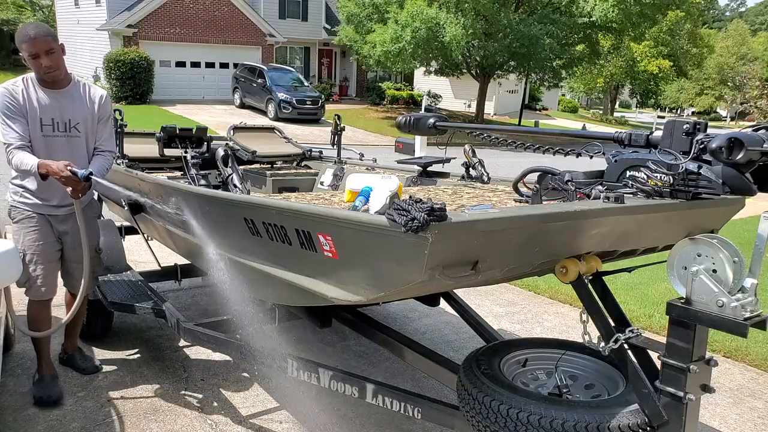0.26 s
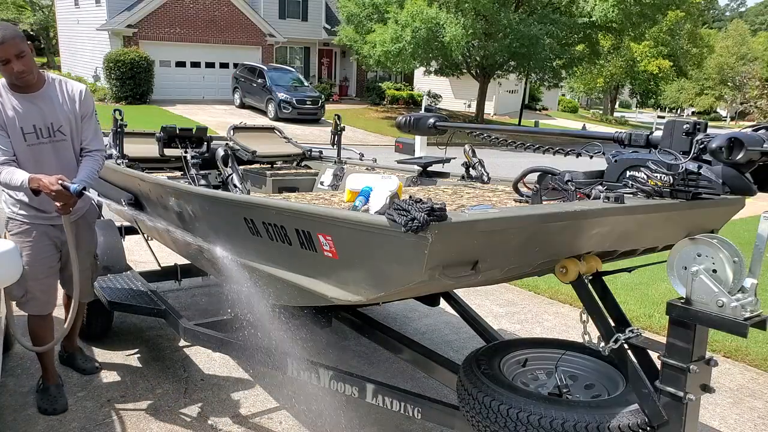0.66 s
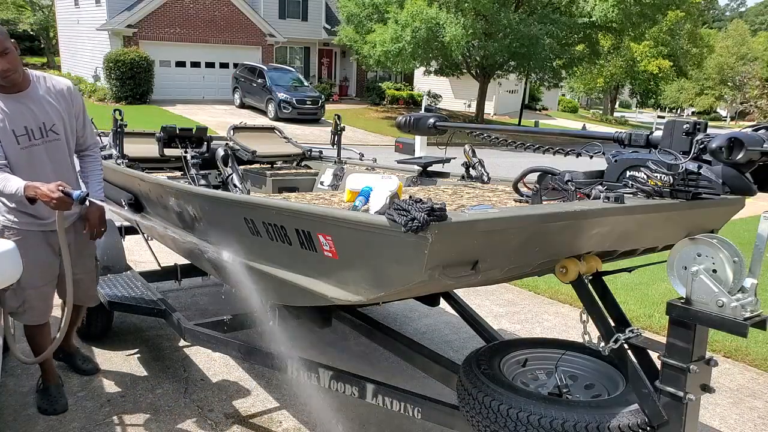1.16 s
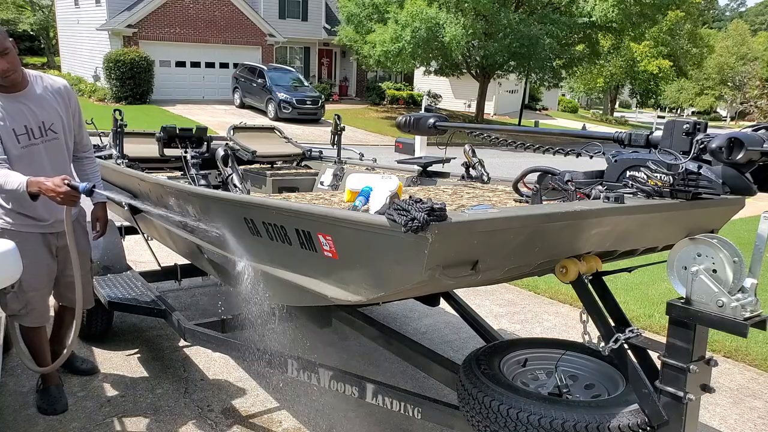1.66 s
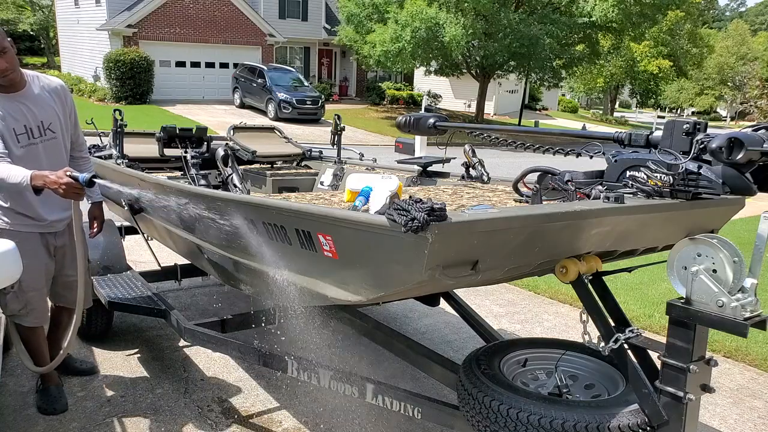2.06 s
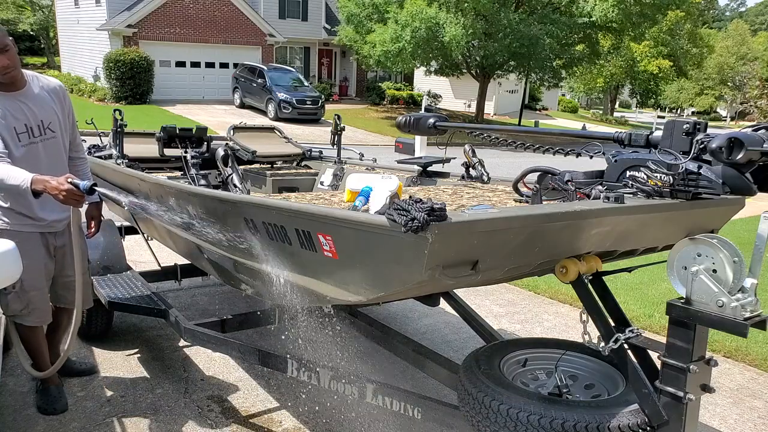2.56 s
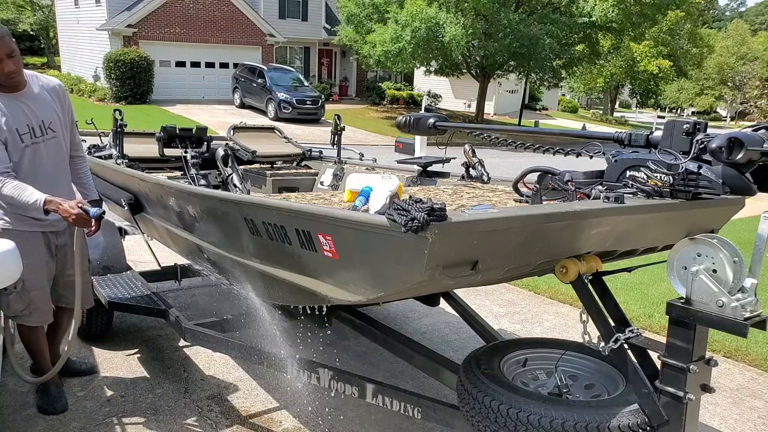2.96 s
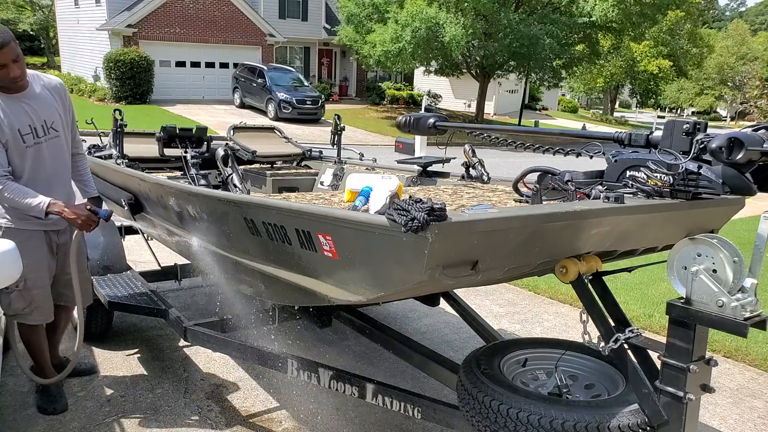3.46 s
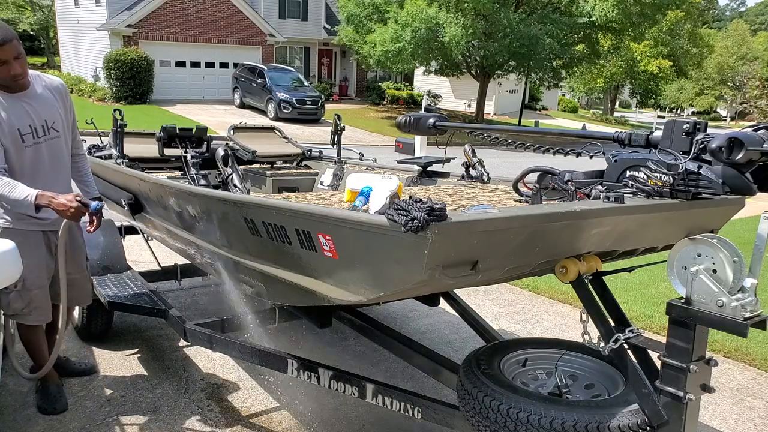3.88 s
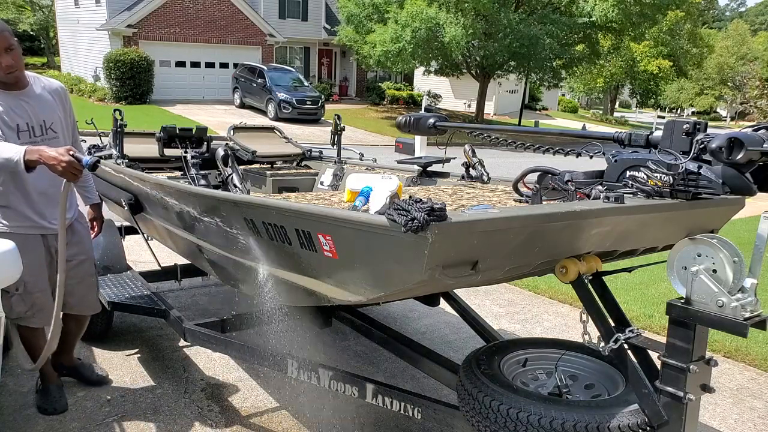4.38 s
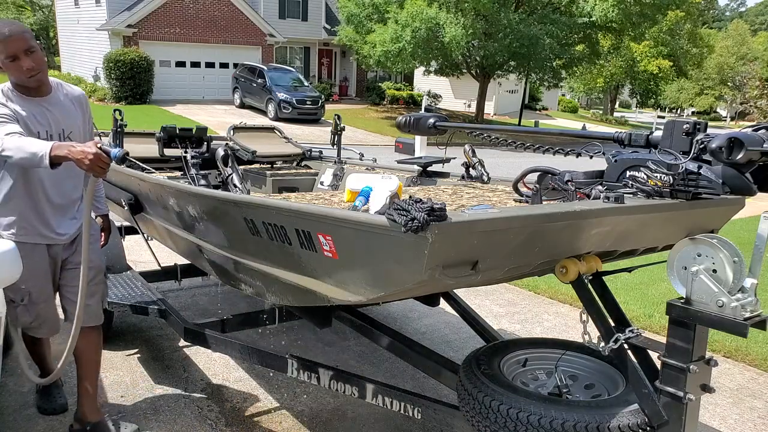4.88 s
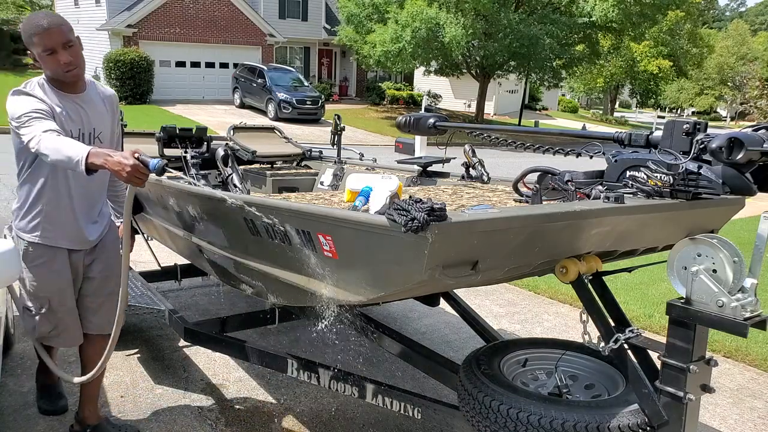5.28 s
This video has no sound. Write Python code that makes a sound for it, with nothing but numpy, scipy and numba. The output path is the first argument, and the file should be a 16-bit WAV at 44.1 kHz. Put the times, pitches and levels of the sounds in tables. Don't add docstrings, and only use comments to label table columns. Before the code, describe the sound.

Water from a garden nozzle patters loudly on hollow sheet metal, fading to lighter bursts, a dripping pause and a faint resumed hiss.

```python
import sys
import numpy as np
from scipy import signal
from scipy.fft import rfft, irfft
from scipy.io import wavfile
from scipy.ndimage import uniform_filter1d
from numba import njit

SR = 44100
rng = np.random.default_rng(int(sys.argv[2]) if len(sys.argv) > 2 else 0)


def dump(signal):
    limited = np.clip(np.atleast_2d(signal).T, -1, 1)
    pcm = np.round(limited * 32767).astype(np.int16)
    wavfile.write(sys.argv[1], SR, pcm)


def amplitude_ratio(level_db):
    exponent = np.asarray(level_db, float) / 20
    return 10 ** exponent


N = 243873


def unit(x):
    return x / np.sqrt(np.mean(x ** 2))


def shape(points):
    hz, db = np.transpose(points)
    return amplitude_ratio(np.interp(np.log(np.fft.rfftfreq(N, 1 / SR) + 1), np.log(hz), db))


def colour(x, points):
    return unit(irfft(rfft(x) * shape(points), N))


def walk(rate_hz, count, size=N):
    k = max(int(SR / rate_hz * size / N), 1)
    steps = np.repeat(rng.standard_normal((count, 400)), k, axis=1)[:, :size]
    return 1.68 * uniform_filter1d(uniform_filter1d(steps, k), k)


def read(table):
    s, *columns = np.transpose(table)
    return [np.interp(np.arange(N) / SR, s, c) for c in columns]


def bursts(base_db, start_s, hold_s, db, attack_s, t60_s):
    age = np.arange(N) / SR - start_s[:, None]
    late = np.maximum(age - attack_s - hold_s[:, None], 0)
    env = np.clip(age / attack_s, 0, 1) * amplitude_ratio(db[:, None] - 60 * late / t60_s)
    return 10 * np.log10(amplitude_ratio(base_db) ** 2 + np.sum(env ** 2, axis=0))


def glide(start_s, hold_s, hz):
    return np.interp(np.arange(N) / SR, start_s + hold_s / 2, hz)


def drops(rate_hz, spread_db):
    hit = rng.random((3, N)) < rate_hz / SR
    size = rng.exponential(size=(3, N))
    sign = rng.standard_normal((3, N))
    return unit(hit * amplitude_ratio(spread_db * np.minimum(size, 4.0)) * sign)


# leaves t/s, returns t/s, hull level/dB, spray level/dB
MISSES = [
    (0.94, 1.134, -17.5, -2),
    (0.955, 1.121, -8, -6.5),
    (3.055, 3.097, -13, -11),
    (3.812, 3.894, -25, -11),
    (4.518, 5.318, -24, 4),
    (4.522, 4.942, -6.5, -31),
]


def misses():
    leave_s, return_s = 0.14, 0.049
    t = np.arange(N) / SR
    leaves, returns, *loss_db = np.transpose(MISSES)[:, :, None]
    off = np.clip((t - leaves) / leave_s, 0, 1) * np.clip(1 - (t - returns) / return_s, 0, 1)
    return [np.sum(db * off, axis=0) for db in loss_db]


@njit
def ring(x, hz, t60, gain):
    out = np.zeros(len(x))
    for m in range(len(hz)):
        p = np.exp(2j * np.pi * hz[m] / SR - np.log(1000) / (t60[m] * SR))
        z, norm = 0j, np.sqrt(1 - abs(p) ** 2)
        for i in range(len(x)):
            z = z * p + x[i] * gain[m, i >> 6] + 1e-18
            out[i] += norm * z.imag
    return out


# f/Hz, width/Hz, level/dB
PANELS = [(459, 16, -9), (1280, 140, -8.5), (1780, 44, -18), (2190, 92, 0), (2878, 160, 5)]


def hull(*struck):
    count = 110
    plate_hz = 200 + 27 * (np.arange(count) + rng.random(count))
    panel_hz, width_hz, panel_db = np.transpose(PANELS)
    hz = np.r_[plate_hz, panel_hz]
    t60_s = np.r_[.1 * (plate_hz / 1000) ** -.3, 2.2 / width_hz]
    db = np.r_[np.zeros(count), panel_db + 3.5]
    spot = walk(9., count=len(hz), size=N // 64 + 1)
    patch = uniform_filter1d(walk(16., count=len(hz), size=N // 64 + 1), size=9, axis=0)
    near = 0
    for pitch_hz, on in struck:
        octaves = np.log2(hz[:, None] / pitch_hz[::64])
        near = near + on[::64] * np.exp(-(octaves / .2) ** 2)
    gain = amplitude_ratio(db[:, None] + 3.0 * spot + 4.5 * patch + 13.0 * near)
    low = hz < 870
    power = np.where(low[:, None], np.mean(gain[low] ** 2, axis=0), np.mean(gain[~low] ** 2, axis=0))
    gain = gain / np.sqrt(power)
    return np.array([ring(swarm, hz, t60_s, gain) for swarm in drops(7000, 3.02)])


# t/s, force level/dB, panel looseness (boom over drumming) level/dB, left minus right level/dB
AIM = [(0, -30.5, -7, 1), (.47, -33.5, -3, 1.5), (.9, -34, -5.5, 1), (1.3, -29.5, -3.5, 2),
       (1.7, -29, -1, 0.5), (1.92, -31.5, 0, 0.5), (2.05, -35.5, -4, 1.5), (2.4, -41, -2, 1.5),
       (2.6, -46, -0.5, 2), (3.05, -48.5, -0.5, 2), (3.3, -42, -1, 2.5), (3.75, -48.5, -3, 1.5),
       (4.0, -40.5, -3, 2), (4.3, -45, 8, 2), (4.5, -49.5, 5.5, 1.5), (5.36, -48.5, 4.5, 2),
       (5.53, -50, 0, 1.5)]
# t/s, hold/s, level/dB, f/Hz
BOOMS = [(0.006, 0.057, -32, 694), (0.23, 0.15, -36.5, 705), (0.548, 0.13, -37.5, 524),
         (0.71, 0.1, -37, 286), (0.89, 0.045, -33, 515), (1.201, 0.049, -31, 467), (1.437, 0.032, -39, 564),
         (1.588, 0.05, -40, 627), (1.668, 0.077, -31, 425), (1.886, 0.029, -58, 610),
         (2.118, 0.036, -56, 278), (2.242, 0.11, -35.5, 486), (2.442, 0.024, -45, 590),
         (2.65, 0.015, -37.5, 630), (2.856, 0.048, -44.5, 490), (3.125, 0.19, -41.5, 694),
         (3.525, 0.0083, -46.5, 530), (3.615, 0.011, -55.5, 823), (3.964, 0.025, -35.5, 508),
         (4.187, 0.057, -35, 480), (4.3, 0.03, -39, 258), (4.406, 0.022, -38.5, 590),
         (5.118, 0.036, -56.5, 435), (5.327, 0.1, -41, 510)]
# t/s, hold/s, level/dB, f/Hz
PATTERS = [(0.026, 0.036, -48, 1530), (0.193, 0.094, -34.5, 1500), (0.335, 0.045, -31, 1820),
           (0.594, 0.037, -54, 1710), (0.857, 0.04, -36, 1360), (1.034, 0.12, -55, 1680),
           (1.225, 0.027, -33.5, 1310), (1.35, 0.14, -33.5, 1890), (1.57, 0.049, -32, 1210),
           (1.804, 0.035, -31, 1220), (2.088, 0.029, -54, 1960), (2.47, 0.037, -69, 1500),
           (2.55, .015, -57, 2850), (2.62, 0.089, -43.5, 1620), (2.723, 0.099, -44, 2160),
           (2.877, 0.062, -44, 2200), (3.137, 0.022, -38.5, 1840), (3.234, 0.022, -37.5, 1260),
           (3.35, 0.042, -36.5, 1160), (3.535, 0.052, -63.5, 1340), (3.607, 0.015, -43, 1090),
           (3.962, 0.062, -38.5, 1050), (4.099, 0.036, -37.5, 2090), (4.155, 0.056, -34.5, 1750),
           (4.328, 0.089, -46.5, 2210), (4.948, .008, -77, 2150), (5.1, 0.027, -66, 1180),
           (5.185, .02, -70, 1550)]
# f/Hz, level/dB per Hz
BOOM = [(90, -44.5), (180, -22), (280, -4.5), (450, -0.5), (750, 2), (1000, -3), (1500, -18)]
# f/Hz, level/dB per Hz
DRUM = [(500, -35.5), (800, -13), (1200, 0.5), (2000, 1), (2600, 2), (3000, -12), (4000, -34.5)]


def jet_on_hull(hull_loss_db):
    cross_in_s, cross_out_t60_s = .018, 0.13
    force_db, loose_db, pan_db = read(AIM)
    booms, patters = np.transpose(BOOMS), np.transpose(PATTERS)
    base_db = force_db + hull_loss_db
    boom_db = bursts(base_db + loose_db, *booms[:3], cross_in_s, cross_out_t60_s)
    drum_db = bursts(base_db, *patters[:3], cross_in_s, cross_out_t60_s)
    on_loose = 1 - amplitude_ratio(base_db - (boom_db - loose_db)) ** 2
    on_tight = 1 - amplitude_ratio(base_db - drum_db) ** 2
    loose_hz = glide(booms[0], booms[1], booms[3])
    tight_hz = glide(patters[0], patters[1], patters[3])
    sheet = hull((loose_hz, on_loose), (tight_hz, on_tight))
    sound = amplitude_ratio(boom_db - 4.5) * colour(sheet, BOOM) + amplitude_ratio(drum_db + 0.5) * colour(sheet, DRUM)
    return sound, drum_db, pan_db


def spray(points, rate_hz, spread_db, flicker_db):
    grains = rfft(colour(drops(rate_hz, spread_db), points))
    octave = np.log2(np.fft.rfftfreq(N, 1 / SR) + 1)
    out = np.zeros((3, N))
    for centre in np.arange(11, 14.3, 1 / 3):
        band = irfft(grains * np.clip(1 - 3 * abs(octave - centre), 0, 1), N)
        out += band * amplitude_ratio(flicker_db * (walk(13., count=1) + walk(45., count=1)))
    return unit(out)


# t/s, flow level/dB, coarseness (splash over mist) level/dB, lip hiss level/dB
FLOW = [(0, -36, 3.5, 7), (.49, -35, -2, 1), (.8, -32, -2, 1.5), (.97, -35.5, -3, 3), (1.3, -31.5, -1, 2),
        (1.33, -25, -0.5, 7.5), (1.6, -30.5, 0.5, 6), (1.93, -36.5, 0.5, 4), (2.05, -47, 2.5, 4),
        (2.55, -53, 0.5, 5.5), (3.2, -48, 1, -3.5), (3.85, -55.5, 2, 5), (3.98, -45, -3, 8),
        (4.53, -54, 3, 6), (5.0, -53, -16, 6.5), (5.19, -65, -27, 3), (5.3, -47, -7, 6),
        (5.53, -43.5, -15, 2)]
# t/s, hold/s, mist level/dB, coarseness level/dB
SPURTS = [(0.07, 0.24, -35, 2.5), (0.519, 0.035, -28, 0), (0.612, 0.15, -35, 3.5),
          (0.758, 0.01, -29.5, 2.5), (1.186, 0.084, -48, 4), (1.876, 0.028, -52, -2),
          (2.294, .015, -44.5, -13), (2.362, 0.026, -48, -24), (2.458, 0.051, -53, -7),
          (2.625, 0.042, -44, -19), (2.933, 0.02, -55.5, 15), (3.157, 0.039, -40, -2.5),
          (3.356, 0.021, -28.5, -0.5), (3.536, 0.022, -49.5, 4.5), (3.965, 0.013, -64, -10.5),
          (4.079, 0.038, -35, 4.5), (4.619, 0.095, -71.5, -3), (5.043, 0.011, -52, -15),
          (5.095, 0.022, -54, -10), (5.1, .004, -42.5, -15), (5.206, 0.0092, -61, 5),
          (5.32, 0.079, -40, -7)]
# f/Hz, level/dB per Hz
SPLASH = [(3000, -15), (4100, 1), (4900, -3), (5800, -0.5), (7500, -2.5), (8300, -8), (9300, -10),
          (12000, -26.5)]
# f/Hz, level/dB per Hz
MIST = [(8000, -34.5), (9600, -0.5), (11000, -1), (13000, 3.5), (14500, 6.5), (15300, 12.5), (16100, -18)]
# f/Hz, level/dB per Hz
LIP = [(5200, -34), (6500, -10), (7800, -1), (8700, -5.5), (9600, -6), (11000, -8.5), (13000, -6),
       (16000, -24)]
# f/Hz, level/dB per Hz
FRINGE = [(2300, -32), (2800, -5), (3300, -6), (3800, -8), (4200, -14.5), (5000, -24)]


def nozzle_spray(drum_db, hull_loss_db, spray_loss_db):
    splash_in_s, spit_in_s, spit_out_t60_s = .025, .014, 0.22
    flow_db, coarse_db, lip_db = read(FLOW)
    s, hold, spit_db, spit_coarse_db = np.transpose(SPURTS)
    mist_db = bursts(flow_db + spray_loss_db, s, hold, spit_db, spit_in_s, spit_out_t60_s)
    splash_base_db = flow_db + coarse_db + 1.24 * spray_loss_db
    splash_db = bursts(splash_base_db, s, hold, spit_db + spit_coarse_db, splash_in_s, spit_out_t60_s)
    edge_db = -4 + 0.44 * splash_db + (1 - 0.44) * drum_db + 0.029 * hull_loss_db
    bright_db = 0.035 * (mist_db + 41)
    out = amplitude_ratio(splash_db - 2.5) * spray(SPLASH, 9000, 2.5, 0.57)
    out = out + amplitude_ratio(mist_db + 2.0 + bright_db) * spray(MIST, 14000, 1.9, 1.1)
    out = out + amplitude_ratio(mist_db + lip_db - 8) * spray(LIP, 12000, 1.3, 1.94)
    return out + amplitude_ratio(edge_db + 3.5) * spray(FRINGE, 6000, 2.1, 0.59)


# t/s, cancelled share/0-1
ECHO_NOTCH = [
    (0, 1),
    (.3, 1),
    (.5, .9),
    (.6, 0),
    (1.05, 0.5),
    (1.3, 0.16),
    (2.0, 0.34),
    (5.53, 0.02),
]


def driveway(x):
    notch_hz, width_hz = 9480, 420
    band = np.exp(-((np.fft.rfftfreq(N, 1 / SR) - notch_hz) / width_hz) ** 2 / 2)
    share = np.clip(read(ECHO_NOTCH)[0], 0, .97)
    return x - share * irfft(rfft(x) * band, N)


# f/Hz, level/dB per Hz
YARD = [(110, -60), (180, -16), (262, -14), (515, -23.5), (994, -28), (2110, -31), (8770, -41.5),
        (16000, -39.5)]
# f/Hz, level/dB per Hz
ROAD = [(25, -55), (45, -19.5), (70, -1), (120, 2), (170, -1.5), (250, -9), (400, -50)]
# t/s, hold/s, level/dB
GUSTS = [(0, 0.028, -56), (0.136, 0.049, -53.5), (0.486, 0.29, -58), (1.26, 0.038, -56), (1.43, 0.033, -63),
         (1.663, 0.13, -54), (2.183, 0.05, -62), (2.977, .03, -65), (3.583, 0.039, -60), (4.03, .1, -67),
         (4.28, 0.035, -58), (5.332, 0.063, -59)]
# f/Hz, level/dB rms
HUM = [(118.4, -72.5), (236.9, -70.5)]


def yard():
    calm_db, gust_in_s, gust_out_t60_s = -71, 0.027, 0.39
    air_db = -71 - 0.5 + 1.1 * walk(4.8, count=1)
    air = amplitude_ratio(air_db) * colour(rng.standard_normal((2, N)), YARD)
    mid, side = colour(rng.standard_normal((2, N)), ROAD)
    road_db = bursts(calm_db, *np.transpose(GUSTS), gust_in_s, gust_out_t60_s) + 0.66 * walk(21, count=1)
    road = amplitude_ratio(road_db) * (mid + amplitude_ratio(-18.0) * np.array([side, -side]))
    turns_s = np.cumsum(1 + 0.0035 * walk(4.4, count=1)[0]) / SR
    hum = np.zeros(N)
    for (hz, db), waver in zip(HUM, walk(16, count=len(HUM))):
        hum += amplitude_ratio(db + 2.0 + 0.93 * waver) * np.sin(2 * np.pi * hz * turns_s)
    return air + road + hum


# t/s, hold/s,
# level/dB, f/Hz
SLUGS = [(0.032, 0.019, -32, 2040), (0.041, 0.01, -31, 910), (0.041, 0.041, -40, 2880),
         (0.218, 0.067, -35, 730), (0.218, 0.069, -31, 2280), (0.229, 0.019, -30, 1050),
         (0.534, 0.017, -33, 1330), (0.543, 0.02, -33, 2500), (0.665, 0.02, -35, 1080),
         (0.697, 0.023, -34, 2300), (0.769, 0.01, -30, 4370), (0.862, 0.015, -30, 1245),
         (1.205, 0.053, -46, 2540), (1.228, 0.0089, -32, 1165), (1.579, 0.026, -31, 610),
         (1.625, 0.026, -39, 1570), (1.64, 0.04, -33, 423), (1.672, 0.035, -34, 1660),
         (1.727, 0.011, -34, 786), (1.756, 0.068, -32.5, 2830), (1.811, 0.04, -36, 561),
         (1.823, 0.032, -33, 2080), (1.901, 0.063, -39.5, 767), (1.904, 0.042, -32, 544),
         (1.945, 0.01, -39, 800), (2.058, 0.072, -43, 2030), (2.13, 0.032, -40, 1720),
         (2.287, 0.0062, -35.5, 2860), (2.534, 0.0073, -36.5, 3080), (2.644, 0.014, -41, 1560),
         (2.772, 0.01, -35.5, 3020), (3.051, 0.014, -44.5, 1250), (3.367, 0.029, -35.5, 2560),
         (3.532, 0.0082, -42, 1270), (3.547, 0.01, -46, 654), (3.619, 0.008, -44, 820),
         (3.794, 0.011, -47.5, 856), (3.95, 0.0091, -37.5, 895), (4.032, 0.013, -36.5, 870),
         (4.093, 0.01, -36, 2300), (4.098, 0.01, -33, 3140), (4.098, 0.021, -38.5, 710),
         (4.101, 0.01, -37, 1410), (4.296, 0.0096, -34.5, 2060), (4.299, 0.012, -40, 260),
         (4.351, 0.052, -44, 2150), (5.091, 0.01, -64, 5700), (5.494, 0.012, -46, 590),
         (0.04, 0.037, -40, 1100), (0.168, 0.065, -33, 2100), (0.236, 0.014, -36, 2990),
          (0.449, 0.075, -41, 1780), (0.602, 0.021, -42, 305), (0.698, 0.026, -37, 4250),
          (0.701, 0.052, -36, 3220), (0.882, 0.014, -40, 438), (0.886, 0.063, -45, 1330),
          (1.349, 0.037, -26, 3580), (1.471, 0.032, -30.5, 2220), (1.475, 0.009, -37, 327),
          (1.6, 0.038, -33, 1580), (1.744, 0.037, -38, 1640), (1.756, 0.044, -39, 600),
          (1.807, 0.052, -31, 1090), (1.852, 0.047, -37, 1700), (1.855, 0.026, -36, 2630),
          (1.891, 0.01, -36, 754), (1.968, 0.055, -45, 1690), (2.014, 0.019, -40, 746),
          (2.102, 0.026, -38, 3000), (2.202, 0.013, -41, 596), (2.212, 0.01, -49, 1170),
          (2.333, 0.045, -43, 1730), (2.35, 0.039, -42, 304), (2.441, 0.01, -42, 644),
          (2.466, 0.022, -43, 2990), (2.961, 0.01, -41.5, 2240), (3.166, 0.011, -40.5, 890),
          (3.23, 0.02, -44.5, 836), (3.368, 0.017, -38.5, 1050), (3.365, 0.029, -37.5, 5400),
          (3.374, 0.014, -33, 7560), (3.435, 0.052, -46, 1270), (3.531, 0.011, -45, 890),
          (3.541, 0.0099, -46, 654), (3.614, 0.01, -53, 865), (3.788, 0.011, -60, 835),
          (4.014, 0.035, -39.5, 2660), (4.089, 0.026, -36.5, 2340), (4.177, 0.017, -48, 2000),
          (4.207, 0.014, -41, 593), (4.252, 0.014, -43, 422), (4.354, 0.026, -41, 2110),
          (4.394, 0.038, -46, 1110), (4.42, 0.023, -47, 820), (4.484, 0.02, -46.5, 1740),
         (0.64, .04, -44, 290), (1, 0.072, -48, 3200), (1.002, .01, -57, 310), (1.156, 0.049, -39, 380),
          (1.2, 0.035, -38, 1100), (2.096, 0.056, -50, 280), (2.451, 0.046, -62, 3600),
          (2.484, 0.037, -51, 274), (2.8, 0.039, -59, 177), (2.978, 0.031, -56, 290),
          (3.921, 0.026, -51, 2800), (4.3, 0.04, -50, 217), (5.05, 0.0091, -60, 4500),
          (5.091, .003, -51, 5600), (5.36, 0.057, -52.5, 220),
         (1.095, .016, -48.5, 1490), (1.241, .009, -36, 2870), (1.245, .007, -34, 3690),
            (2.091, .069, -41, 2040), (2.19, 0.014, -47, 1040), (2.306, 0.076, -44, 2890),
            (3.139, 0.029, -42, 2200), (3.142, .016, -44, 2900), (3.33, .016, -45, 2110),
            (3.435, .021, -50, 2140), (3.471, 0.077, -51, 1270), (3.551, .026, -50.5, 5590),
            (3.616, 0.019, -45, 850), (4.953, 0.0061, -66, 2190), (4.963, 0.094, -71, 1690),
            (5.09, .003, -60, 4910), (5.091, .003, -55, 6040), (5.097, .021, -64, 1190),
            (5.177, .016, -63, 1640), (5.235, .005, -58, 6990), (5.268, .049, -64, 1540),
            (5.491, .029, -50.5, 2080)]


def slugs():
    in_s, out_t60_s, size = 0.016, 0.098, 16384
    out, t, bins_hz = np.zeros((3, N + size)), np.arange(size) / SR, np.fft.rfftfreq(size, 1 / SR)
    for s, hold, db, hz in SLUGS:
        width_hz = max(0.052 * hz, 28.4)
        cluster = np.exp(-((bins_hz - hz) / width_hz) ** 2 / 2)
        env = np.clip(t / in_s, 0, 1) * 1000 ** (-np.maximum(t - in_s - hold, 0) / out_t60_s)
        shake = rng.standard_normal((3, size))
        sound = env * irfft(rfft(shake) * cluster, size)
        level = np.sqrt(np.mean(env ** 2) / np.mean(sound ** 2, axis=1, keepdims=True))
        i = int(s * SR)
        out[:, i:i + size] += amplitude_ratio(db) * sound * level
    return out[:, :N]


# t/s, hold/s, level/dB, f/Hz
WHISTLE = [(.99, 0.105, -45.5, 3607), (1.41, 0.0582, -32, 3243), (1.497, 0.015, -28.5, 3260),
           (4.94, .05, -68.5, 3500), (5.0, 0.019, -58.5, 3500), (5.049, 0.012, -52.5, 3586),
           (5.11, .05, -65, 3490), (5.179, 0.077, -63, 3730), (5.276, 0.016, -52, 3410),
           (5.312, .008, -52, 3450), (5.375, 0.044, -51.5, 3560), (5.45, .04, -59, 3510)]
# t/s, hold/s, level/dB, f/Hz
SING = [
    (1.25, 0.056, -45, 5600),
    (1.32, 0.27, -40, 5580),
]


def whistle(rows, size):
    s, hold, db, hz = np.transpose(rows)
    level_db = bursts(-100., s, hold, db, 0.0066, 0.15) + 1.5 * walk(25, count=1)
    rough = uniform_filter1d(uniform_filter1d(rng.standard_normal((2, 3, N)), size), size)
    carrier = np.exp(2j * np.pi * np.cumsum(glide(s, hold, hz)) / SR)
    return amplitude_ratio(level_db + 3.5) * unit(np.real((rough[0] + 1j * rough[1]) * carrier))


# t/s, peak level/dB, f/Hz, ring t60/s, scattered tail level/dB
DRIPS = [(1.489, -20.5, 3170, 0.005, 5.5), (2.552, -35, 2680, 0.006, -9), (2.7886, -23, 2720, 0.0083, -4.5),
         (2.936, -32.5, 3500, 0.004, 2.5), (3.101, -32.5, 3910, 0.005, -14), (4.017, -51, 2640, 0.003, -3),
         (4.68, -59, 6240, 0.005, -8), (4.737, -67, 6370, 0.0057, -5), (4.794, -32.5, 3730, 0.004, -9.5),
         (4.8925, -37.5, 3870, 0.0086, -8), (5.059, -50, 4400, 0.005, -11), (5.108, -40, 5130, 0.006, -16),
         (5.245, -51, 3420, 0.005, -19)]
# f/Hz, level/dB
TICK = [(1800, -40.5), (2800, -25), (3600, 3), (5000, -0.5), (7000, -4.5), (8000, -35.5), (12000, -41)]


def drips():
    echo_t60_s, bounce_s = .12, .0035
    out, t = np.zeros((3, N)), np.arange(5000) / SR
    for s, db, hz, t60_s, tail_db in DRIPS:
        detune, late = rng.standard_normal((2, 14))
        modes_hz = np.clip(hz * 2 ** (.2 + .35 * detune), 3000, 7400)[:, None]
        rings = np.mean(np.sin(2 * np.pi * modes_hz * t), axis=0) * 1000 ** (-t / t60_s)
        echo = rng.standard_normal((3, len(t))) * 1000 ** (-t / echo_t60_s)
        i = int(s * SR)
        out[:, i:i + len(t)] += amplitude_ratio(db + tail_db) * echo
        for k, bounce_db in enumerate((6, -3, -4, -10)):
            i = int((s + k * bounce_s * (1 + .1 * late[k])) * SR)
            out[:, i:i + len(t)] += amplitude_ratio(db + bounce_db) * rings
    return irfft(rfft(out) * shape(TICK), N)


# f/Hz, level/dB
SCATTER = [(60, -18), (250, -9), (500, -3), (1000, -1.5), (2000, .5), (5000, 2.5), (9000, 2), (15000, 0)]
# f/Hz, level/dB to each side
SHADE = [(100, -0.5), (1000, 0.37), (5000, 0.86), (8000, -0.5), (15000, -2)]


def ports(swarms, pan_db):
    lag_samples = 6.42
    lag = np.exp(-2j * np.pi * np.fft.rfftfreq(N) * lag_samples)
    shared, *own = rfft(swarms)
    wet = shape(SCATTER)
    both = (np.array([shared, shared * lag]) + wet * np.array(own)) / np.sqrt(1 + wet ** 2)
    both = both * np.array([shape(SHADE), 1 / shape(SHADE)])
    return irfft(both, N) * amplitude_ratio(np.array([pan_db, -pan_db]) / 2)


def scene():
    hull_loss_db, spray_loss_db = misses()
    drumming, drum_db, pan_db = jet_on_hull(hull_loss_db)
    jet = drumming + nozzle_spray(drum_db, hull_loss_db, spray_loss_db)
    surge = amplitude_ratio(walk(30.047, count=1)[0])
    near = driveway(jet * surge) + slugs()
    near = near + whistle(WHISTLE, size=125) + whistle(SING, size=260) + drips()
    return ports(near, pan_db) + yard()


def top_cut(x):
    return signal.sosfilt(signal.butter(12, 17100, fs=SR, output="sos"), x)


def record(dry):
    cut = signal.sosfilt(signal.ellip(10, .2, 80, 15800, fs=SR, output="sos"), dry)
    return top_cut(cut)


dry = scene()
out = record(dry)
dump(out)
```